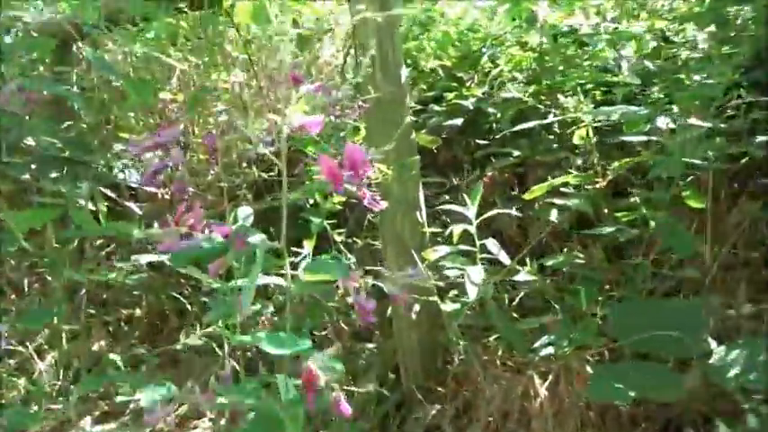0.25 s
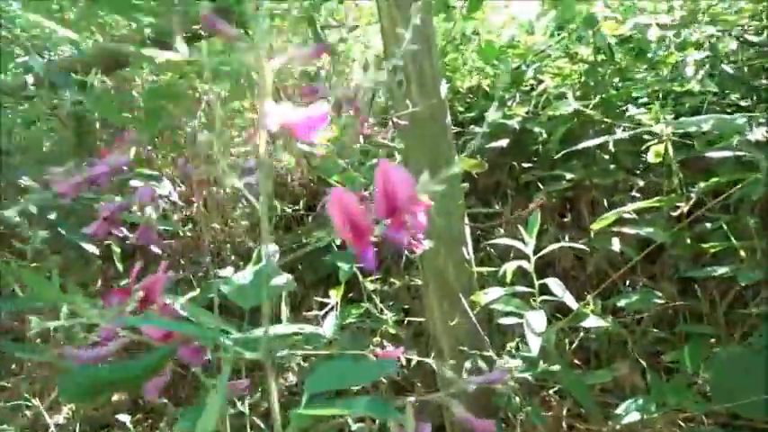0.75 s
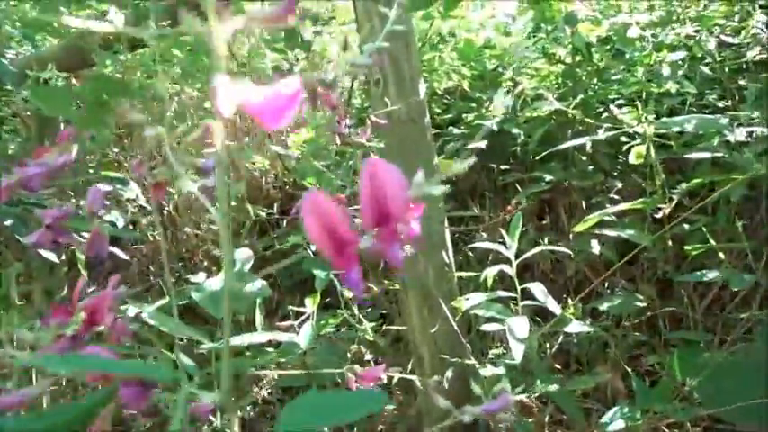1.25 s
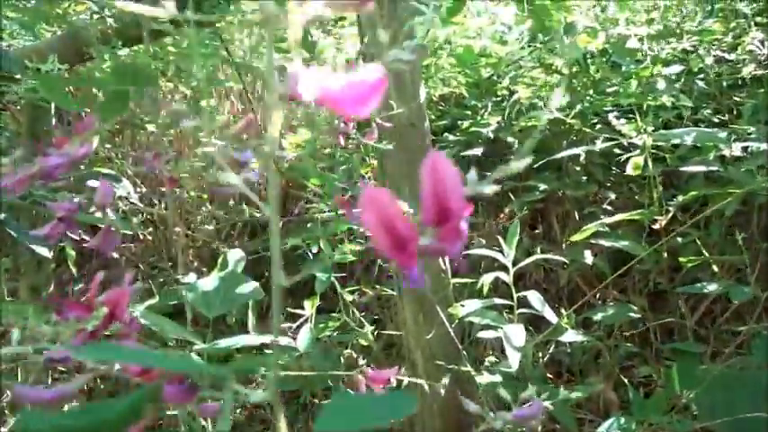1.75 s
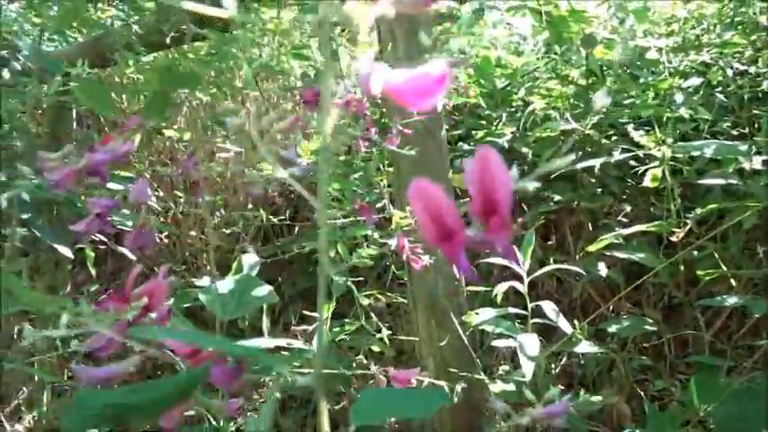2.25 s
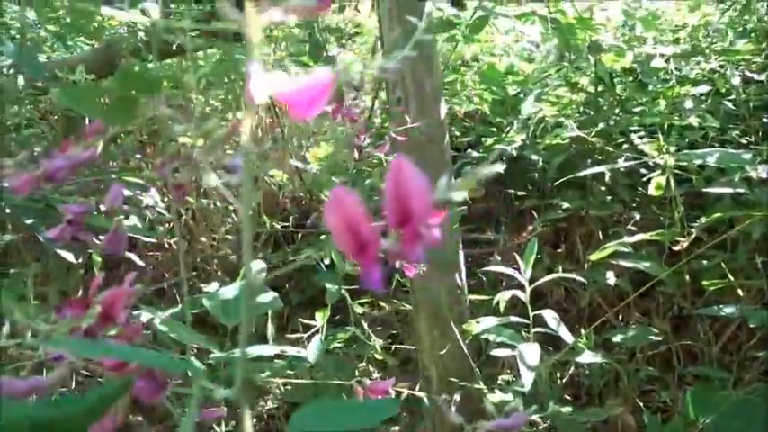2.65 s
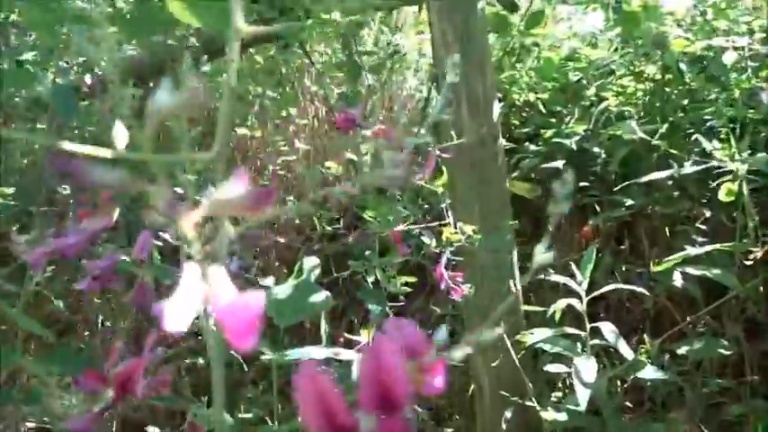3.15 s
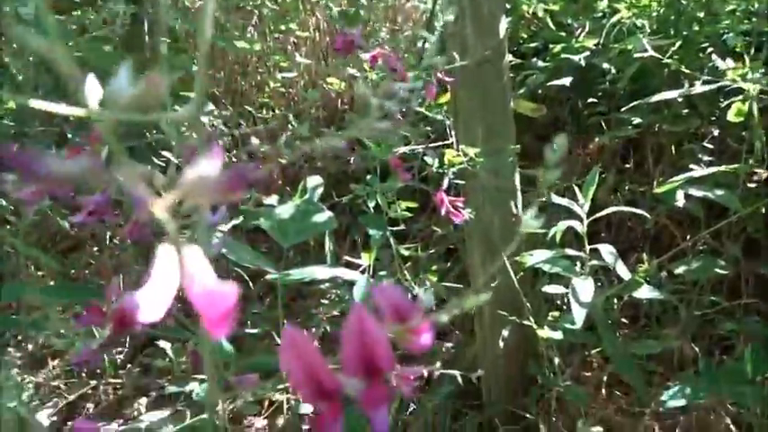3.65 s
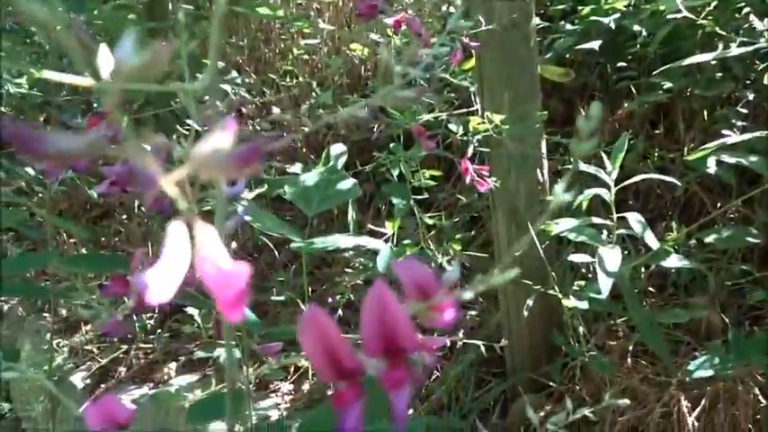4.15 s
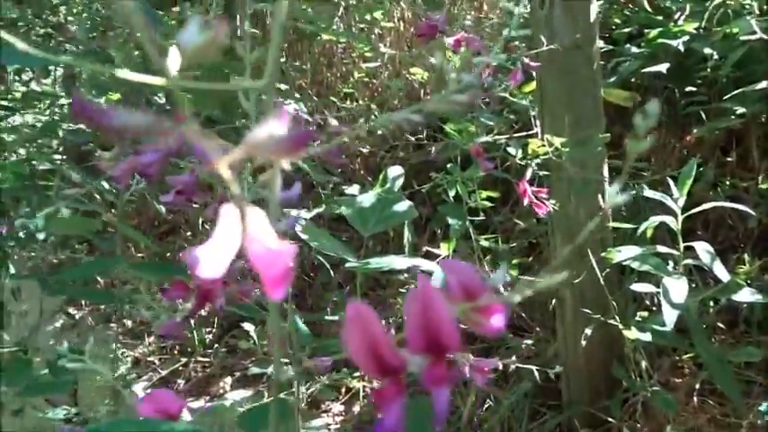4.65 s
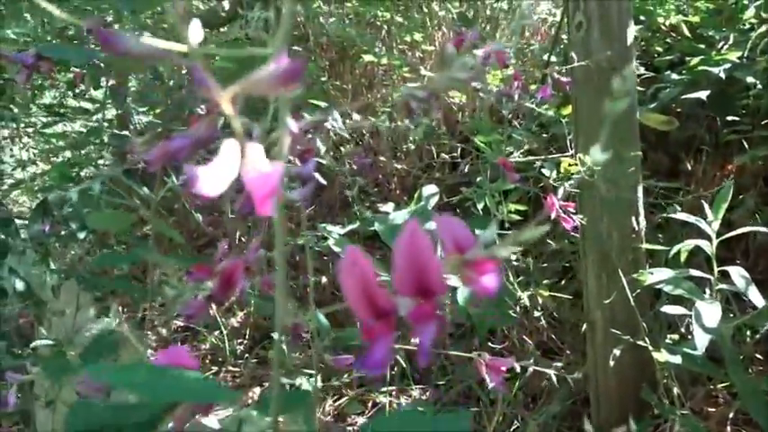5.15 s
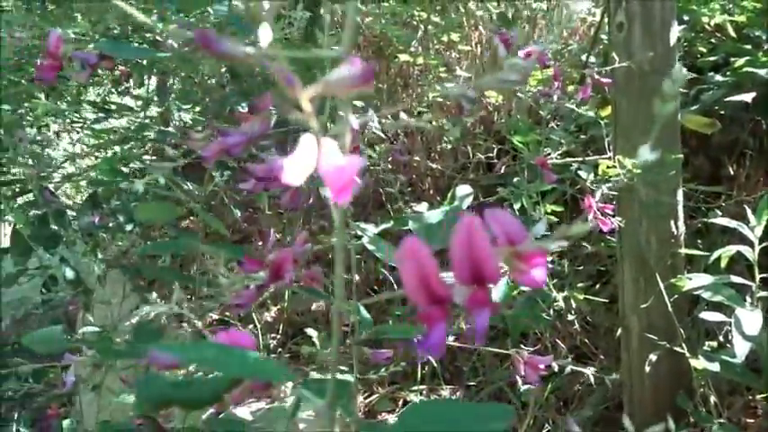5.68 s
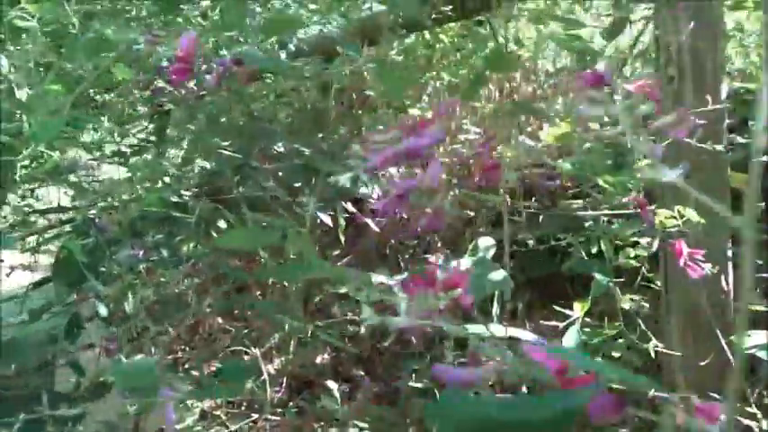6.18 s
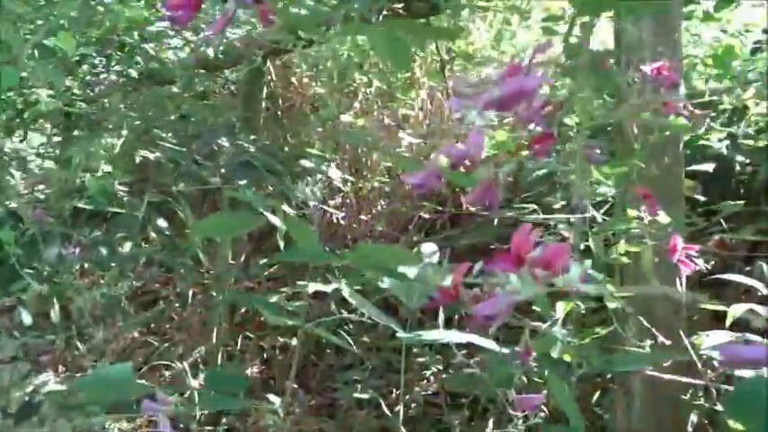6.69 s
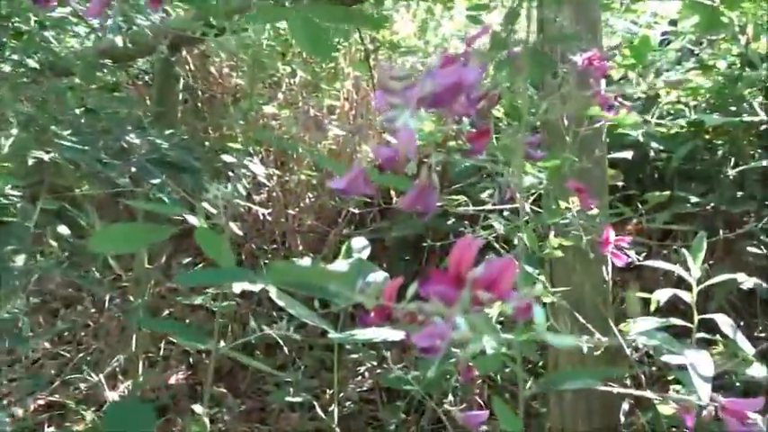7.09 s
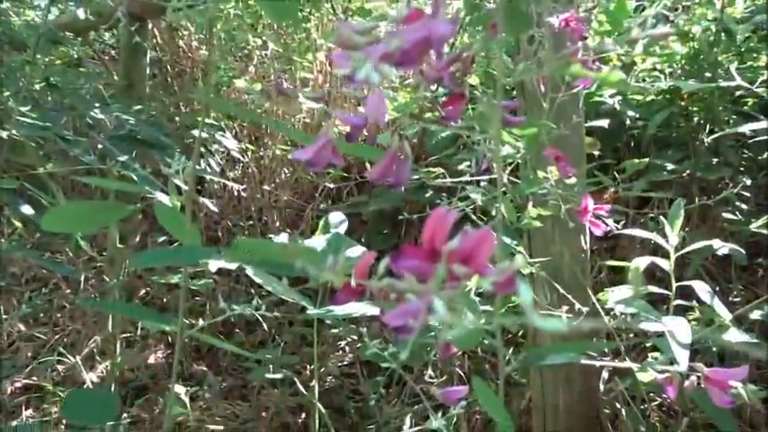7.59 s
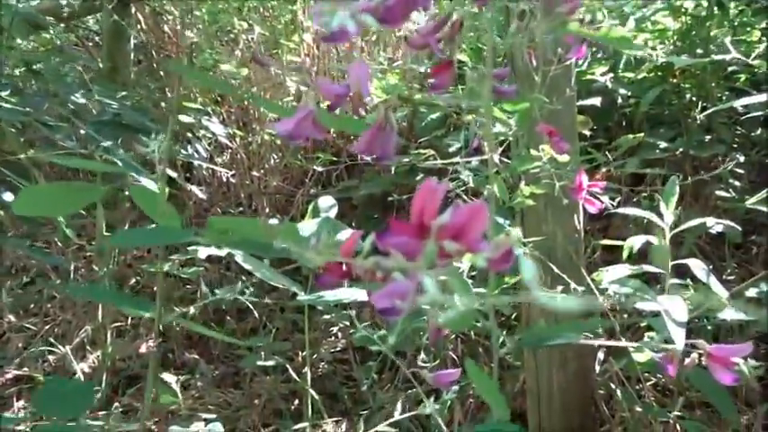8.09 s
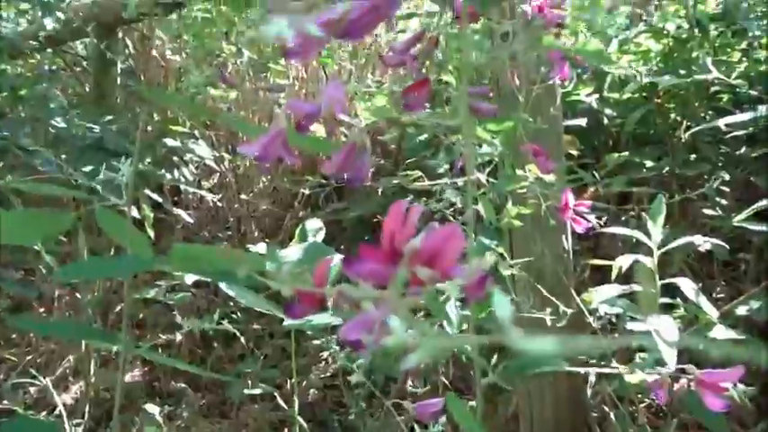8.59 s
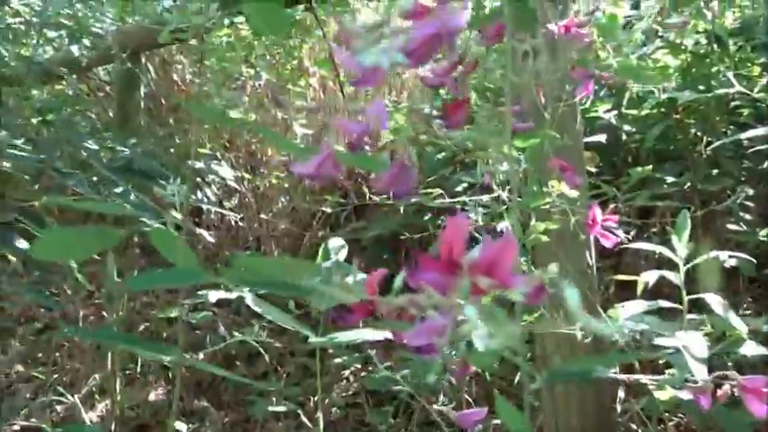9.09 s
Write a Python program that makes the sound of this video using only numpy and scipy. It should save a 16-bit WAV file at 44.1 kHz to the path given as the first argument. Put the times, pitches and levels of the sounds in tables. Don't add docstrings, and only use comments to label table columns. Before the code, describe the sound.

Dense pulsing cicada drone over soft distant traffic, small plastic ticks close by, then a quick dry twig crack near the end.

```python
import sys
import numpy as np
from scipy import signal
from scipy.fft import rfft, irfft, next_fast_len
from scipy.io import wavfile
from scipy.ndimage import uniform_filter1d, map_coordinates

SR = 44100
rng = np.random.default_rng(int(sys.argv[2]) if len(sys.argv) > 2 else 0)


def voltage_ratio(decibels):
    exponent = np.asarray(decibels, float) / 20
    return 10 ** exponent


def transcribe(u):
    v = np.clip(np.atleast_2d(u).T, -1, 1)
    q = np.round(v * 32767).astype(np.int16)
    wavfile.write(sys.argv[1], SR, q)


N = 411453


def unit(x):
    return x / np.sqrt(np.mean(np.abs(x) ** 2) + 1e-20)


def along(points, hz):
    f, v = np.transpose(points)
    return np.interp(np.log(hz + 1), np.log(f + 1), v)


def curves(rows):
    s, *cols = np.transpose(rows)
    return [np.interp(np.arange(N) / SR, s, c) for c in cols]


def wobble(rate_hz, n=N):
    knots = rng.standard_normal(int(n * rate_hz / SR) + 4)
    return map_coordinates(knots, [np.arange(n) * rate_hz / SR])


def filtered(x, response):
    n = x.shape[-1]
    m = next_fast_len(n + 8192)
    return irfft(rfft(x, m) * response(np.fft.rfftfreq(m, 1 / SR)), m)[..., :n]


def panned(pair, pan_db):
    return pair * voltage_ratio(np.reshape([pan_db, -pan_db], (2, -1)) / 2)


def patchy(patchy_db):
    z = signal.stft(rng.standard_normal((2, N)), nperseg=512)[2]
    field = uniform_filter1d(rng.standard_normal(z.shape[1:]), size=6, axis=0)
    field = uniform_filter1d(field, size=14, axis=1)
    noise = signal.istft(z * voltage_ratio(patchy_db * unit(field)), nperseg=512)[1]
    return unit(noise[:, :N])


# frequency in Hz, likeness 0-1.
PORT_LIKENESS = [(30, .2), (70, .3), (150, .85), (300, .8), (600, .8), (1400, .72), (3000, .48),
                 (6000, .34), (13000, .25)]
# frequency in Hz, lead in radians.
PORT_LEAD = [(0, 0), (340, 0.1), (690, 1.7), (950, 1.3), (2330, 2.4), (3010, 1.1), (3530, 1.6), (6370, 5.8),
             (7490, 10.3), (8180, 9.5), (11900, 16.5), (13800, 17.1), (14400, 17.9), (16300, 16.1)]
# frequency in Hz, left-right level in dB.
BODY_SHADOW = [(200, .5), (350, 1.8), (700, 0), (8000, 0), (10000, -2), (14000, 1.8)]


def ports(*layers):
    m = next_fast_len(N + 8192)
    hz = np.fft.rfftfreq(m, 1 / SR)
    turn = np.arccos(np.clip(along(PORT_LIKENESS, hz), 0, 1)) / 2
    lead = np.exp(.5j * along(PORT_LEAD, hz)) * voltage_ratio(along(BODY_SHADOW, hz) / 2)
    kept_mid = np.abs(np.cos(turn) * (lead + 1 / lead) / 2) ** 2
    kept_side = np.abs(np.sin(turn) * (lead - 1 / lead) / 2) ** 2
    kept = kept_mid + kept_side
    both = 0
    for pair, spectrum in layers:
        gain = voltage_ratio(along(spectrum, hz))
        both = both + rfft(pair, m) * gain / np.sqrt(np.mean(kept * gain ** 2))
    mid, side = both * [np.cos(turn), np.sin(turn)]
    return irfft([(mid + side) * lead, (mid - side) / lead], m)[:, :N]


# frequency in Hz, density in dB per Hz.
TRAFFIC = [(13, -64), (22, -33.5), (183, -28), (211, -20.5), (298, -14), (325, -16), (355, -8.5),
           (380, -13), (511, -4.5), (663, -1), (736, 6), (1140, -6), (1400, -5.5), (1820, -33),
           (3080, -120)]


def traffic():
    level_db = -46.5 + 0.95 * wobble(2.74)
    return voltage_ratio(level_db) * patchy(0.7)


# frequency in Hz, density in dB per Hz.
HISS = [(6000, -120), (7500, -62), (10000, 14), (15700, 14.5), (16000, -120)]


def hiss():
    return voltage_ratio(-54.0) * rng.standard_normal((2, N))


# frequency in Hz, density in dB per Hz.
RUMBLE = [(60, -120), (130, -18), (210, -0.5), (330, 0), (480, 1), (800, -120)]


def passing_vehicle():
    nearest_s, span_s, peak_db = 8.02, 1, -62
    nearness = np.exp(-((np.arange(N) / SR - nearest_s) / span_s) ** 2)
    rumble = filtered(rng.standard_normal(N), lambda hz: voltage_ratio(along(RUMBLE, hz)))
    return voltage_ratio(peak_db) * nearness * unit(rumble)


# time in seconds, pitch in Hz, level in dB.
HUM = [(5.5, 522, -62), (5.8, 528.3, -58.5), (7.3, 521, -66.5), (7.43, 485, -50), (7.6, 481, -63),
       (8.05, 458, -58), (8.2, 500, -75), (8.33, 521, -56), (9.22, 522, -56), (9.33, 530, -51)]


def motor_hum():
    hum_hz, hum_db = curves(HUM)
    fade = np.clip((np.arange(N) / SR - HUM[0][0]) / 0.24, 0, 1)
    phase = 2 * np.pi * np.cumsum(hum_hz) / SR + 0.28 * wobble(3.7)
    return fade * voltage_ratio(hum_db + 3) * np.sin(phase)


# time in seconds, level in dB.
GROVE_LEVEL = [(0, -41.5), (.9, -42), (2.2, -44), (3, -40), (4, -42.5), (6.5, -42), (8, -44), (9.33, -43.5)]
# frequency in Hz, density in dB per Hz.
GROVE = [(650, -43), (1100, -20.5), (1550, -4), (1720, -0.5), (2520, -4.5), (2900, -1), (3770, -1.5),
         (6380, -120)]


def far_grove():
    level_db = curves(GROVE_LEVEL)[0] + 0.2 * wobble(2.82)
    return ports((voltage_ratio(level_db) * patchy(1.5), GROVE))


# start in seconds, length in seconds, level in dB.
GROVE_CALLS = [
    (.15, .32, -46),
    (1.64, .26, -46),
    (2.683, 0.51, -48),
    (3.401, 0.39, -54),
    (4.08, 0.38, -46.5),
    (4.547, .2, -48.5),
    (5.4, .32, -47),
    (6.4, 0.28, -51),
    (7.85, .22, -54),
]


def grove_calls():
    call_hz, rise_hz, rough_hz = 1732, 174, 219.6
    out = np.zeros((2, N))
    for start_s, length_s, db in GROVE_CALLS:
        t = np.arange(round(length_s * SR)) / SR
        rough = np.array([wobble(rough_hz, len(t)), wobble(rough_hz, len(t))])
        tone = np.sin(2 * np.pi * (call_hz * t + rise_hz * t ** 2 / (2 * length_s)))
        swell = voltage_ratio(db + 4) * np.sqrt(np.sin(np.pi * t / length_s))
        out[:, round(start_s * SR):][:, :len(t)] += swell * rough * tone
    return out


def background():
    bed = panned(ports((traffic(), TRAFFIC), (hiss(), HISS)), -0.27)
    grove = panned(far_grove() + grove_calls(), -3.6)
    return bed + grove + passing_vehicle() + motor_hum()


# time in seconds, peak in dB, pitch in Hz, t60 in seconds, left-right level in dB.
TICKS = [
    (0.152, -17.5, 950, 0.037, -3),
    (0.167, -21.5, 710, 0.13, -2),
    (0.863, -27, 1950, 0.19, -7),
    (1.442, -28, 810, 0.03, 4),
    (1.701, -28, 850, 0.051, 1),
    (2.515, -37.5, 1750, 0.051, 31),
    (3.527, -29, 1480, 0.1, -5),
    (5.952, -25.5, 1390, 0.11, -10),
]


def grip():
    out = np.zeros((2, N + SR))
    t = np.arange(SR // 10) / SR
    for start_s, db, hz, t60_s, pan_db in TICKS:
        ring = np.sin(2 * np.pi * hz * t)
        ring += 0.16 * np.sin(2 * np.pi * 1.5 * hz * t)
        ring += 0.19 * np.sin(2 * np.pi * 0.54 * hz * t)
        scratch = 2.3 * uniform_filter1d(rng.standard_normal(len(t)), size=8) * voltage_ratio(-60 * t / 0.0077)
        decay = voltage_ratio(db - 60 * t / np.clip(t60_s, .004, .022))
        out[:, round(start_s * SR):][:, :len(t)] += panned(decay * (ring + scratch), pan_db)
    return out[:, :N]


# time in seconds, knock in dB, crack in dB re knock, left-right level in dB.
SNAP = [
    (8.262, -25, -9, 5),
    (8.270, -26, -9, 4),
    (8.2755, -23, -2, 5),
    (8.2785, -20, -4, 4),
    (8.2822, -23, 1, 5),
    (8.2862, -22, 0, 6),
    (8.2898, -16, 0, 7),
    (8.297, -28, -16, 3),
    (8.404, -33, -6, 2),
]
# centre in Hz, width in Hz, level in dB.
TWIG = [(443, 360, -2.5), (910, 480, -0.5), (1590, 860, -7)]
# frequency in Hz, density in dB per Hz.
CRACK = [(1500, -120), (2500, -6), (6500, 0.5), (8500, -9), (11000, -6), (14500, -3), (16000, -4)]


def twig():
    cracks, knocks = np.zeros((2, SR // 2)), np.zeros((2, SR // 2))
    t = np.arange(SR // 40) / SR
    first = round(SNAP[0][0] * SR) - SR // 20
    for start_s, db, crack_db, pan_db in SNAP:
        spike = 2.0 * voltage_ratio(-60 * t / 0.001)
        tear = rng.standard_normal((2, len(t))) * (1 + spike)
        crack = voltage_ratio(db + crack_db + 3 - 60 * t / .017) * tear
        knock = voltage_ratio(db + 9.0 - 60 * t / 0.041) * tear[:1]
        i = round(start_s * SR) - first
        cracks[:, i:][:, :len(t)] += panned(crack, pan_db)
        knocks[:, i:][:, :len(t)] += panned(knock, pan_db)

    def wood(f):
        return sum((-1) ** k * voltage_ratio(db) * 1j * f * width / (centre ** 2 - f * f + 1j * f * width)
                   for k, (centre, width, db) in enumerate(TWIG))

    snap = filtered(cracks, lambda hz: voltage_ratio(along(CRACK, hz))) + filtered(knocks, wood)
    return np.pad(snap, ((0, 0), (first, N - first - SR // 2)))


def click_train(rate_hz, jitter, smear_s, drift, twin, flutter, tuned_hz):
    n, start_hz = len(rate_hz), rate_hz[0]
    cycles = np.cumsum(rate_hz) / SR + jitter * wobble(28.1, n)
    size, top = 2 ** 13, int(16000 / rate_hz.max())
    age_s = np.arange(2 * top) / (2 * top * start_hz)
    ribs = 1 + .5 * np.cos(2 * np.pi * 4 * start_hz * age_s)
    bursts = rng.standard_normal((2, 2, 2 * top)) * ribs * np.exp(-age_s / smear_s)
    partials = rfft(bursts)
    partials = partials / np.abs(partials) ** .8
    order = np.arange(top + 1)
    partials = partials * (1 + twin * (-1) ** order)
    plain_rms = np.sqrt(np.mean(irfft(partials, size) ** 2))
    lift = sum(voltage_ratio(2.5) * np.exp(-((order * start_hz - hz) / 450) ** 2) for hz in tuned_hz)
    shapes = irfft(partials * (1 + lift - 0.29 * len(tuned_hz)), size) / plain_rms
    place = (cycles % 1 * size).astype(int)
    turn = drift * np.arange(n) / SR + flutter * wobble(16, n)
    return np.cos(turn) * shapes[0][:, place] + np.sin(turn) * shapes[1][:, place]


def choir(syllables, attack_s, release_s, rasp_share, **clicks):
    rasp_s, rasp_db = .17, 3
    near, blur = np.zeros((2, 2, N)), np.zeros((2, N))
    for rate_hz, start_s, end_s, db, clear, sac_db, growth_db, tuned_hz in syllables:
        i, j = max(round(start_s * SR), 0), min(round(end_s * SR), N)
        t = np.arange(i, j) / SR
        clear, quick_s = np.clip(clear, 0, .95), (end_s - start_s) / 3
        rise = np.clip((t - start_s) / min(attack_s, quick_s), 0, 1)
        fall = np.clip((end_s - t) / min(release_s, quick_s), 0, 1)
        growth = voltage_ratio(db + growth_db * (t - (start_s + end_s) / 2))
        rasp = rasp_share * np.clip(2 - 2 * (end_s - t) / rasp_s, 0, 1)
        swell = rise * fall * growth * voltage_ratio([[0], [sac_db]]) * voltage_ratio(rasp_db * rasp)
        clear = clear * (1 - rasp)
        train = click_train(rate_hz[i:j], tuned_hz=tuned_hz, **clicks)
        near[..., i:j] += np.sqrt(clear) * swell[:, None] * train
        blur[:, i:j] += (1 - clear) * swell ** 2
    return near, blur


# time in seconds, rate in Hz.
NEAR_RATE = [(0, 212.2), (.32, 212.6), (.62, 210.9), (.87, 209), (1.1, 204.8), (4.2, 199.5), (5.0, 216.4),
             (5.06, 214.7), (5.4, 213.4), (5.65, 213.7), (6.12, 211.8), (6.44, 209.6), (6.7, 207.8),
             (7.17, 201.6), (7.4, 202.7), (8.33, 208.9), (8.76, 207.6), (8.95, 210.2)]
SLOW_RATE = [(0, 163.4), (.49, 158.6), (.51, 156), (.75, 160), (1.25, 155), (1.47, 154.2), (1.9, 149.3),
             (1.95, 147.6), (2.19, 146.4), (2.22, 141.7)]
DEEP_RATE = [(3.08, 174.8), (3.32, 175.5), (3.75, 175.2), (4.12, 177.6), (5.15, 177), (5.38, 178.1),
             (5.8, 176.7), (5.98, 178.4), (6.4, 177), (6.68, 178.4), (6.82, 177.4), (7.2, 176.6),
             (7.42, 177.6)]
FAINT_RATE = [(1.4, 198.9), (3.5, 191.2), (3.62, 193.5), (3.8, 198.3), (4.2, 200.1), (4.42, 198.2)]
# start in seconds, end in seconds, level in dB, abdomen tuning in Hz.
NEAR_LOW = [(0.061, 0.387, -35.5, 4680), (0.639, .89, -33.5, 4640), (4.149, 4.627, -36, 4800),
            (4.451, 5.088, -31.5, 5020), (5.399, 5.7, -36, 4600), (5.869, 6.146, -35.5, 4750),
            (6.449, 6.753, -33, 5120), (6.953, 7.215, -33.5, 4800), (8.78, 9.013, -39.5, 4450)]
SLOW_LOW = [(.497, 0.54, -36, 3250), (0.523, 0.553, -34.5, 3700), (0.549, .585, -36.5, 4400),
            (0.563, 0.77, -32.5, 4700), (1.221, 1.497, -35.5, 4030), (1.95, 2.24, -35.5, 3650)]
DEEP_LOW = [(2.4, 2.912, -42, 3430), (3.06, 3.35, -40, 3520), (3.72, 4.092, -40, 3470),
            (4.3, 4.625, -41.5, 3570), (5.08, 5.435, -38, 3570), (5.74, 6.282, -43, 4040),
            (6.38, 6.585, -41.5, 3930), (6.62, 6.838, -38.5, 4920), (7.08, 7.464, -38, 3860)]
FAINT_LOW = [(3.621, 3.862, -40, 4140)]
# start in seconds, end in seconds, level in dB, clear share of clicks 0-1.
NEAR_HIGH = [(-.1, .14, -37, .6), (.28, 0.684, -33.5, 1), (.84, 1.16, -34, 0.8), (4.96, 5.51, -34.5, .92),
             (5.57, 6.016, -35, 0.6), (6.07, 6.524, -32.5, .85), (6.63, 7.05, -33, 1),
             (7.14, 7.52, -33.5, 1), (8.247, 8.85, -45.5, .7), (8.961, 9.549, -46.5, 0.78)]
SLOW_HIGH = [(-.1, 0.556, -34.5, 0.39), (.73, 1.34, -34.5, 0.3), (1.42, 2.012, -37, .4),
             (2.17, 2.744, -38, .35), (2.904, 3.47, -43, .1)]
DEEP_HIGH = [(6.98, 7.117, -45, .5), (7.446, 7.752, -43, .5)]
FAINT_HIGH = [(1.25, 1.452, -45, .6), (3.47, 3.7, -49, .4), (3.72, 4.3, -45, .45), (4.36, 4.792, -43, .35)]
# click rate, low syllables, shrill syllables, clear share of the low 0-1,
# deeper sac in dB, shrill growth in dB/s.
SINGERS = [
    (NEAR_RATE, NEAR_LOW, NEAR_HIGH, .85, -4, 2.5),
    (SLOW_RATE, SLOW_LOW, SLOW_HIGH, .9, -1.5, -5),
    (DEEP_RATE, DEEP_LOW, DEEP_HIGH, .95, .8, 0),
    (FAINT_RATE, FAINT_LOW, FAINT_HIGH, .8, -1.5, 2),
]
# time in seconds, level in dB.
CROWD = [(0, -39), (.45, -35.5), (.95, -37), (1.12, -31), (1.6, -31.5), (2.25, -32.5), (2.9, -35),
         (3.2, -36.5), (3.55, -39.5), (4.15, -39.5), (5, -37.5), (6.3, -40.5), (6.9, -40.5), (7.3, -40.5),
         (7.5, -32), (7.9, -29), (8.4, -31.5), (9.33, -39)]
# frequency in Hz, density in dB per Hz.
ABDOMEN = [(3200, -120), (3700, -69), (4100, 5), (4400, 5.5), (4800, 1), (5200, -10), (5550, -23.5),
           (5900, -29), (7000, -120)]
SAC = [(2200, -120), (2400, -27.5), (2750, -15.5), (3400, 0.5), (3800, 3.5), (4100, -1), (4500, -96),
       (5000, -120)]
OVERTONE = [(3120, -76), (5300, -4.5), (5760, -2.5), (6580, -0.5), (7630, -4), (8600, -24.5), (11200, -26),
            (18900, -120)]


def low_syllables():
    rows = []
    for rate, low, _, clear, sac_db, _ in SINGERS:
        rate_hz, = curves(rate)
        rows += [(rate_hz, start_s, end_s, db, clear, sac_db, 0, [hz]) for start_s, end_s, db, hz in low]
    (near, deep), (blur, deep_blur) = choir(rows, .12, .11, rasp_share=0, jitter=.006, smear_s=.006,
                                            drift=8.5, twin=.35, flutter=1.3)
    crowd_db, = curves(CROWD)
    swell_db = crowd_db - crowd_db.mean()
    buzz = patchy(0.88)

    def drive(clicks, blurred, far_db):
        return clicks + np.sqrt(blurred + voltage_ratio(2 * far_db)) * buzz

    main = drive(near, blur, crowd_db)
    sac = drive(deep, deep_blur, -37 + 0.5 * swell_db)
    upper_near_db = -6.5
    upper_crowd_db = -44.5 + 0.42 * swell_db
    upper = voltage_ratio(upper_near_db) * drive(near, blur, upper_crowd_db - upper_near_db)
    return ports((main, ABDOMEN), (sac, SAC), (upper, OVERTONE))


# time in seconds, level in dB.
CROWD_SHRILL = [(0, -40), (2.8, -49), (3.5, -44.5), (7, -45), (8.1, -57), (9.33, -51)]
# frequency in Hz, density in dB per Hz.
SHRILL = [(5000, -37.5), (8500, -22), (9440, -29.5), (10800, -7.5), (12800, 0.5), (14900, -2.5),
          (15900, -2.5)]


def shrill_syllables():
    rows = []
    for rate, _, high, _, _, growth_db in SINGERS:
        rate_hz, = curves(rate)
        rows += [(rate_hz, *row, 0, growth_db, []) for row in high]
    (near, _), (blur, _) = choir(rows, .1, .12, rasp_share=1, jitter=.002, smear_s=.008,
                                 drift=8, twin=.12, flutter=.3)
    crowd_db, = curves(CROWD_SHRILL)
    shrill = near + np.sqrt(blur + voltage_ratio(2 * crowd_db)) * patchy(0.4)
    return ports((shrill, SHRILL))


# time in seconds, low choir left-right in dB, high choir left-right in dB.
BEARING = [(0, -2.5, 9), (.85, -3, 10.5), (4.6, -2.5, 8.5), (5.4, -2, 11.5), (6.2, -2, 11), (7.5, -2, 10),
           (9.33, -2.5, 12)]


def cicadas():
    low_pan_db, high_pan_db = curves(BEARING)
    return panned(low_syllables(), low_pan_db) + panned(shrill_syllables(), high_pan_db - 4.5)


def scene():
    bass_cut_hz = 287
    small = filtered(grip() + twig(), lambda hz: (1j * hz / (bass_cut_hz + 1j * hz)) ** 4)
    return background() + small + cicadas()


def low_pass(x):
    return signal.sosfilt(signal.butter(12, 16710, fs=SR, output="sos"), x)


def record(dry):
    top_hz = 15750
    return low_pass(filtered(dry, lambda hz: hz < top_hz))


dry = scene()
out = record(dry)
transcribe(out)
```